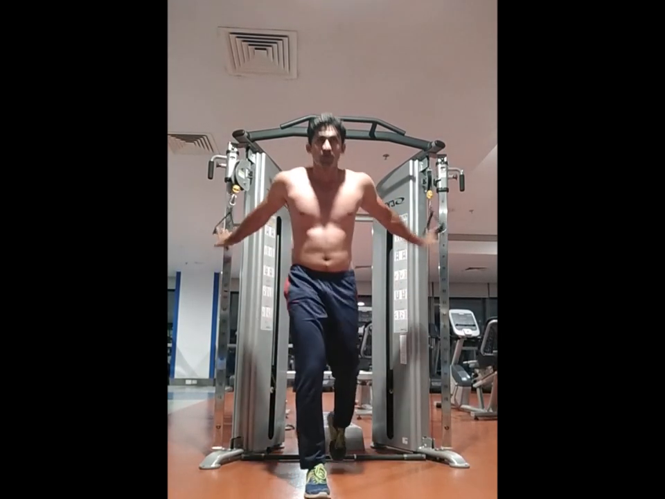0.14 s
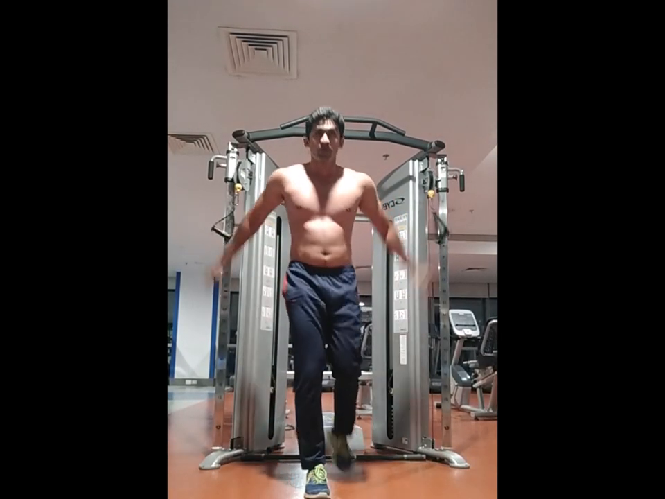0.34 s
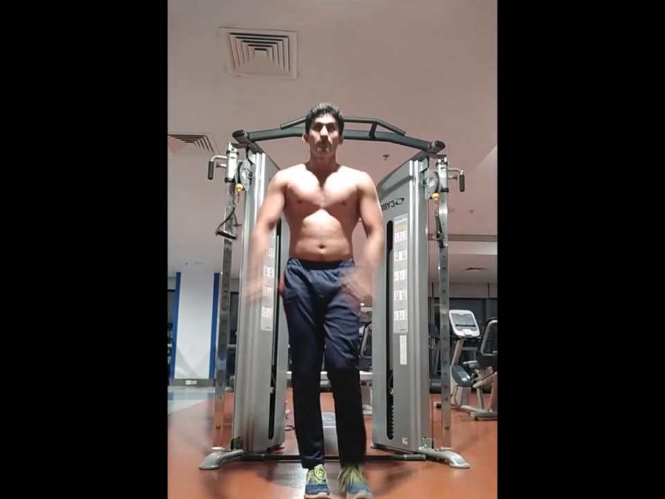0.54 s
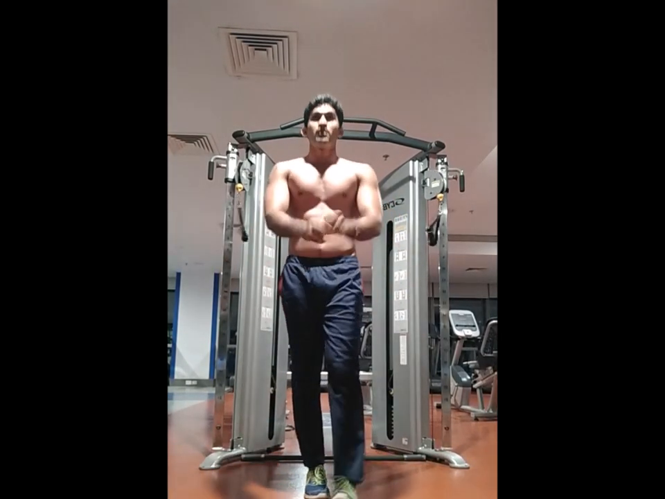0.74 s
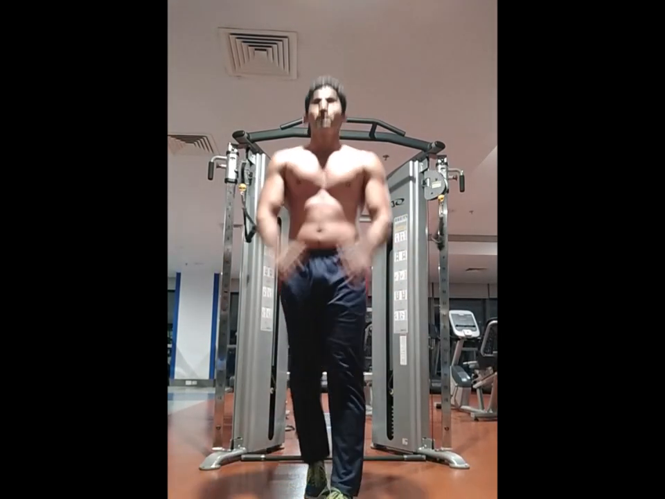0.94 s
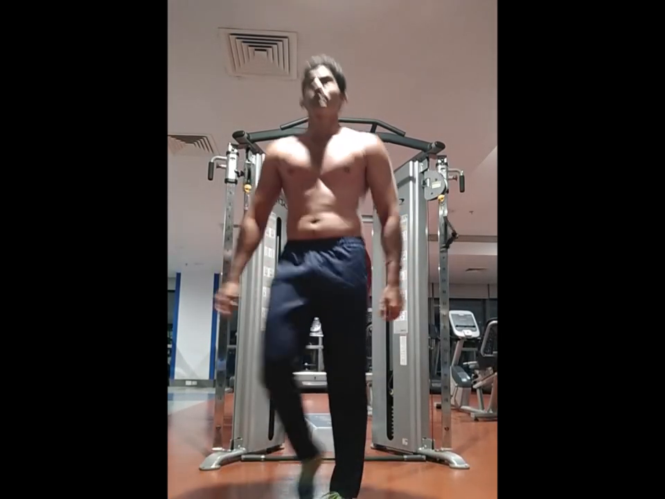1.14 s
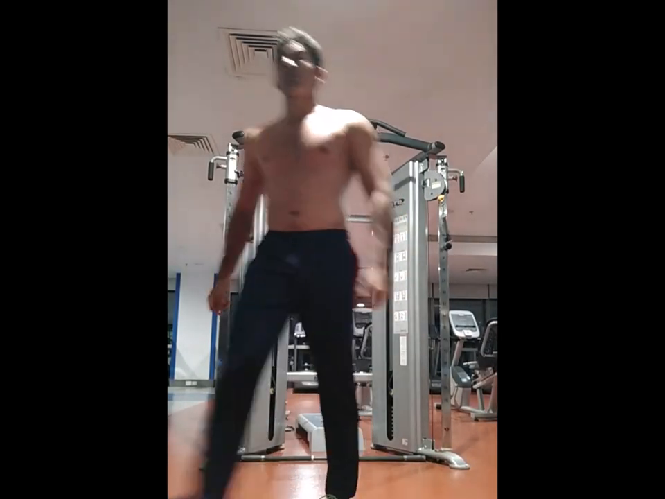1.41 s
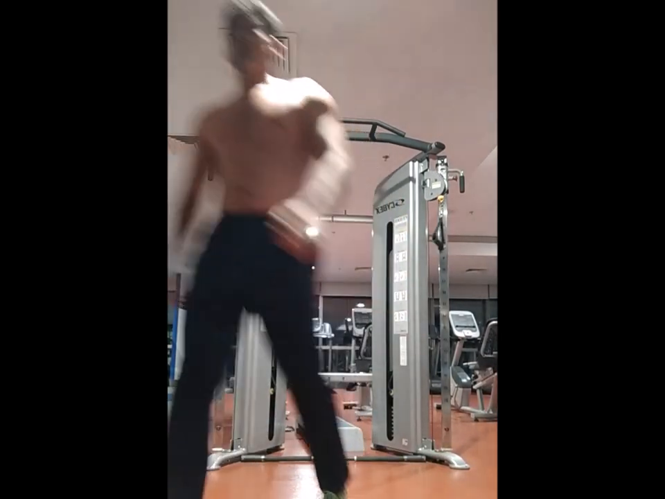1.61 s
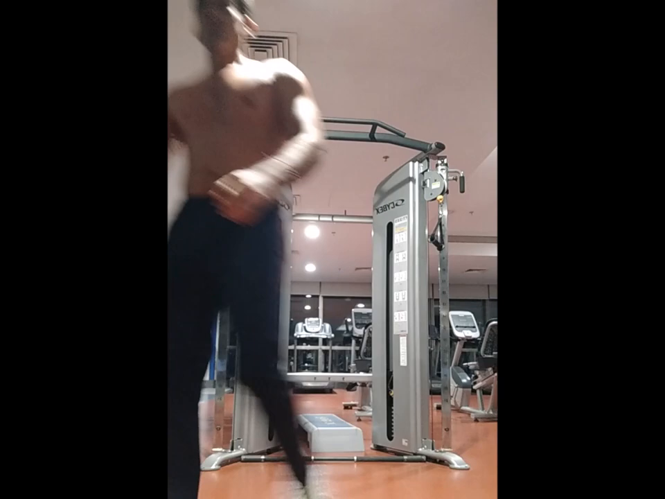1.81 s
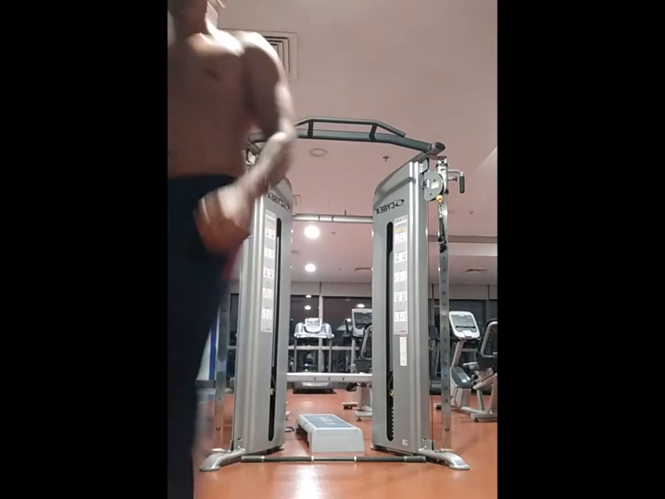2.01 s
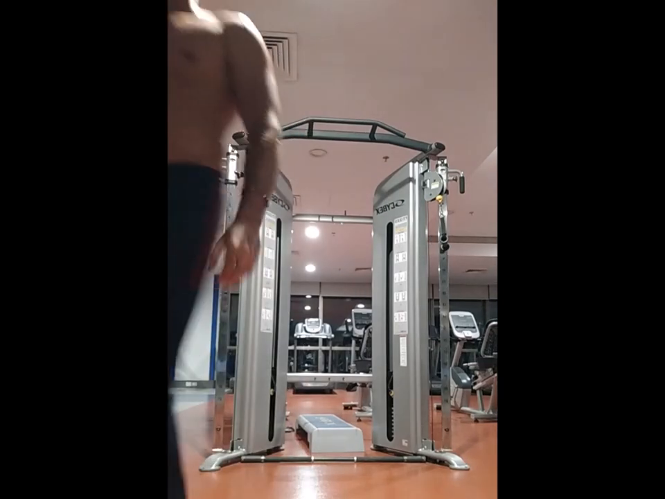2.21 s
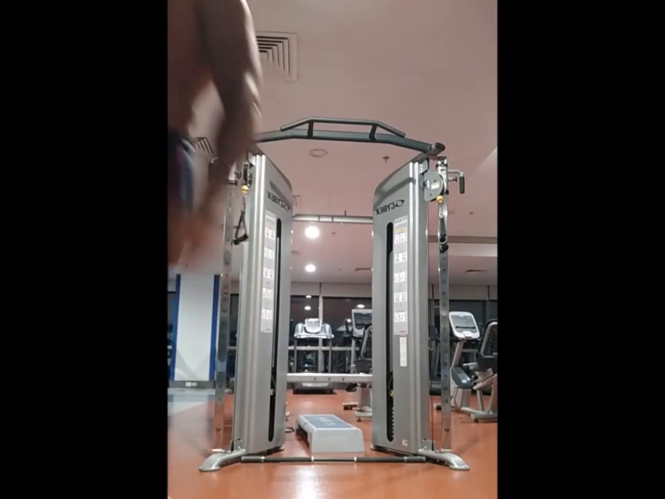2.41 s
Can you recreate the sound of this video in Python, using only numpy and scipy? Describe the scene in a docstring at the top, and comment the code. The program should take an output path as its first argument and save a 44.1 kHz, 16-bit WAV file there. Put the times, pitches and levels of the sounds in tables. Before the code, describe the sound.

A loud steel clank as cable machine handles are let go: brief buckle rattle, bright clang, weight stack landing with clatter, then echo and fainter taps in a bare gym, heard by a phone a few metres away.

```python
"""A gym: the handles of a cable machine are let go. A buckle rattles, a handle clangs on the steel frame, the weight
stack lands, then a swinging handle taps a side panel and a guide rod ever more faintly. Blows ring decaying modes.
Throughout, a long bare hall answers (filtered noise tails) over ventilation (shaped noise, wavering tones) and a
faint high trill (pulsed sine), probably a cricket. A phone a few metres away listens with two ports."""
import sys
import numpy as np
from scipy import signal
from scipy.fft import rfft, irfft
from scipy.io import wavfile
from scipy.ndimage import uniform_filter1d

SR = 44100
rng = np.random.default_rng(int(sys.argv[2]) if len(sys.argv) > 2 else 0)


def voltage_ratio(level):
    """Linear amplitude factor for a level in decibels (scalar or array-like)."""
    return 10 ** (np.asarray(level, float) / 20)


def persist_wave(psi):
    """Save psi, clipped to +-1, as 16-bit WAV."""
    counts = np.round(np.clip(psi, -1, 1) * 32767).astype(np.int16)
    wavfile.write(sys.argv[1], SR, np.atleast_2d(counts).T)


N = 112454


def table(rows, hz):
    """Read (hz, value) rows on a log-frequency axis."""
    rows = np.array(rows, float)
    return np.interp(np.log(hz + 1), np.log(rows[:, 0]), rows[:, 1])


def walk(rate_hz):
    """Slow random wander, spread 1, about rate_hz new values a second."""
    k = int(SR / rate_hz)
    steps = np.repeat(rng.standard_normal(N // k + 1), k)
    w = uniform_filter1d(uniform_filter1d(steps, k), k)[:N]
    return (w - w.mean()) / w.std()


MODE_SCATTER_DB, BUILD_CYCLES = 1, 1.86  # build-up is counted in cycles, so low modes come late
CRASH_T60_S, CRASH_RISE_S, CRASH_LOW_CUT_HZ = 0.056, 0.0044, 507


def struck(blows, modes):
    """Each blow is a chatter of contacts that rings the modes, a little differently each time, and a noise crash."""
    out = np.zeros(2 * N)
    hz, mode_db, t60_s = np.array(modes, float).T[:, :, None]
    t = np.arange(N // 4) / SR
    build = (1 - np.exp(-t * hz / BUILD_CYCLES)) ** 2
    ring = voltage_ratio(mode_db - 60 * t / t60_s) * build * np.sin(2 * np.pi * hz * t)
    high_pass = signal.butter(2, CRASH_LOW_CUT_HZ, "high", fs=SR)
    for start_s, level_db, crash_db, contact_ms, chatter_ms in blows:
        u = t[:N // 40] * 1000 / chatter_ms
        chatter = np.sqrt(u) * np.exp(-2 * u) * rng.standard_normal(len(u)) ** 3
        chatter = chatter / np.sqrt(np.sum(chatter ** 2))
        # divide by the chatter's spectrum at each mode, so each gets about its tabled share
        drive = np.abs(np.exp(-2j * np.pi * hz * t[:len(u)]) @ chatter)
        weight = voltage_ratio(MODE_SCATTER_DB * rng.standard_normal(len(modes))) / np.maximum(drive, .3)
        crash = voltage_ratio(crash_db - 60 * t / CRASH_T60_S) * (1 - np.exp(-t / CRASH_RISE_S))
        crash = signal.lfilter(*high_pass, crash * rng.standard_normal(len(t)))
        sound = signal.fftconvolve(weight @ ring + crash, chatter)[:len(t)]
        # a longer contact dulls the blow
        keep = np.exp(-1000 / (max(contact_ms, .005) * SR))
        sound = signal.lfilter([1 - keep], [1, -keep], sound)
        first = int(start_s * SR)
        out[first:first + len(t)] += voltage_ratio(level_db) * sound
    return out[:N]


# handle on the frame: start_s, level_db, crash_db, contact_ms, chatter_ms
HANDLE_BLOWS = [(.2345, -7.5, -36, 0.11, 2.8), (.2400, -4, 2.5, 0.18, 1.4), (.255, -18, -23, .05, 10.6),
                (.286, -18, 18, 0.076, 7.5), (.325, -14.5, -30, 0.19, 4.2), (.838, -23, -35, 0.38, 12)]
# its modes: pitch_hz, level_db, t60_s
HANDLE_MODES = [(1428, -4, 0.071), (1540, -11, 0.08), (1830, -22, 0.24), (1843, -16.5, 0.16),
                (2099, -2, 0.11), (2525, -10, 0.078), (2603, -12, 0.073), (3190, -15.5, 0.067),
                (4157, -6.5, 0.029), (4400, -14, 0.07)]


def handle_clang():
    """Handle striking the steel frame: bright modes of the steel."""
    return struck(HANDLE_BLOWS, HANDLE_MODES)


# frame tube tones, some in close pairs: pitch_hz, level_db, tone_group
FRAME_TONES = [(1415, 8, 0), (1440, -8, 0), (2118, 7, 1), (2092, -9, 1), (3435, 5, 2)]
# level of each tone group as it dies away unevenly: time_s, group_0_db, group_1_db, group_2_db
FRAME_LEVELS = [(0.24, -25.5, -25, -32), (0.252, -30, -30, -45), (0.278, -40, -49, -52),
                (0.33, -35, -58, -61), (0.344, -31.5, -39, -57), (0.352, -32.5, -27.5, -57),
                (0.366, -30, -35, -22.5), (0.392, -47, -41, -33), (0.412, -37, -38, -37),
                (0.434, -46, -33, -46), (0.508, -41.5, -37, -61), (0.596, -43.5, -37, -35.5),
                (0.626, -53, -59, -35), (0.652, -34.5, -37.5, -40), (0.726, -45, -42, -45.5),
                (0.756, -39, -47, -49.5), (0.778, -44.5, -45, -65.5), (0.826, -52, -70, -62),
                (0.852, -42, -39, -60), (0.89, -43.5, -45.5, -54), (0.916, -38, -57, -74),
                (0.952, -45, -44.5, -72), (0.978, -72, -64, -67), (1.022, -73, -52, -62),
                (1.056, -65.5, -65.5, -73), (1.29, -59.5, -65, -74), (1.316, -64, -76, -68),
                (1.49, -68, -67, -86), (1.516, -70, -68, -69), (1.582, -71, -77, -76),
                (1.664, -67, -72.5, -85), (1.8, -80, -81, -90)]
# one per tone group: gain_db
FRAME_GAIN_DB = [-0.7, -0.3, -2.5]


def frame_ring():
    """The frame tube rings on after the clang; its tones waver, dip and swell again as they die away."""
    t, curve = np.arange(N) / SR, np.array(FRAME_LEVELS)
    levels_db = [np.interp(t, curve[:, 0], curve[:, k + 1], left=-120, right=-120) + gain_db
                 for k, gain_db in enumerate(FRAME_GAIN_DB)]
    out = np.zeros(N)
    for pitch_hz, level_db, group in FRAME_TONES:
        level = voltage_ratio(level_db + levels_db[group] + 2.47 * walk(30.6))
        out += level * np.sin(2 * np.pi * pitch_hz * t + 1.07 * walk(25.07))
    return out


# weight stack on its stops: start_s, level_db, crash_db, contact_ms, chatter_ms
STACK_BLOWS = [(.3630, -7.5, -3, 0.045, 0.92), (.370, -13.5, 16.5, 0.15, 5.5), (.381, -21, -3, .1, 4.5),
               (.40, -20, -1, 0.2, 5), (.445, -17, -8, 0.21, 6.7), (.48, -25, -7, 0.11, 3.2),
               (.53, -28.5, -4, 0.043, 5.4), (.575, -24, -5, 0.14, 4), (.645, -24, -4, 0.08, 2.5),
               (.715, -52, -8, 0.18, 7), (.77, -48, -3.5, 0.14, 5.9), (.845, -45, -15, 0.13, 4.1)]
# its modes: pitch_hz, level_db, t60_s
STACK_MODES = [(240, -16, 0.17), (421, -15, 0.14), (564, -16.5, 0.12), (614.7, -15.5, 0.12),
               (654.1, -15.5, 0.16), (794, -9.5, 0.036), (908, -14, 0.042), (1015, -10, 0.1),
               (1167, -8.5, 0.089), (1219, -21, 0.1), (1500.6, -5.5, 0.04), (3451, -6.5, 0.068),
               (3520, -11.5, 0.1), (3705, -10, 0.046), (3884, -13.5, 0.086), (4616, -11.5, 0.03)]


def stack_landing():
    """Weight stack landing on its stops: one hard blow, then weaker ones, on low and high modes."""
    return struck(STACK_BLOWS, STACK_MODES)


# steel clips and buckles on the cables: start_s, level_db, crash_db, contact_ms, chatter_ms
CLIP_BLOWS = [(.09, -30.5, -24, 0.2, 3.5), (.1345, -27, 5.5, 0.054, 1.6), (.1401, -29, 7.5, 0.048, 4),
              (.165, -34, 13.5, 0.054, 30), (.19, -34, -14, 0.035, 15), (.20, -29, -4, 0.057, 5.4)]
# their modes: pitch_hz, level_db, t60_s
CLIP_MODES = [(914, 8, 0.019), (1334, -0.5, 0.058), (2608, -6, 0.055), (3660, 0, 0.035), (5575, -2, 0.057)]


def clip_rattle():
    """Clips and buckles rattling on the cables: short-lived modes."""
    return struck(CLIP_BLOWS, CLIP_MODES)


# snap hook: start_s, level_db, crash_db, contact_ms, chatter_ms
HOOK_BLOWS = [(.075, -49.5, 10, 0.0049, 49), (.232, -26, 15, 0.022, 90), (.280, -19, 2, 0.012, 7.6),
              (.2875, -15, -11.5, 0.0049, 2), (.36, -36.5, 11.5, 0.012, 6.6), (.44, -34, 10.5, 0.011, 56)]
# its modes: pitch_hz, level_db, t60_s
HOOK_MODES = [(6580, -14.5, .03), (10820, 3, 0.016), (14100, -2, 0.015)]


def hook_jingle():
    """Snap hook jingling: a small part, so only very high modes."""
    return struck(HOOK_BLOWS, HOOK_MODES)


# swinging handle on the side panel: start_s, level_db, crash_db, contact_ms, chatter_ms
TAP_BLOWS = [(1.003, -42, 5, 0.017, 15), (1.0115, -20, -8, 0.029, 0.98)]
# its modes: pitch_hz, level_db, t60_s
TAP_MODES = [(1150, -23, 0.078), (3430, -6, 0.028), (5940, -9.5, 0.022), (6210, -17, 0.013)]


def panel_taps():
    """Swinging handle tapping the side panel: brief contacts, mostly high modes."""
    return struck(TAP_BLOWS, TAP_MODES)


# same handle on a guide rod: start_s, level_db, crash_db, contact_ms, chatter_ms
ROD_BLOWS = [(1.503, -44.5, 4, 0.011, 8), (1.510, -30.5, -1, 0.015, 1.45), (1.519, -42, 6, 0.01, 14),
             (1.545, -47, 6, 0.022, 16), (1.979, -35.5, -21, 0.08, .7), (2.3475, -43, -10, .04, 1.7)]
# its modes: pitch_hz, level_db, t60_s
ROD_MODES = [(1100, -15, .07), (3270, -16, .08), (3686, -7.5, .04), (4300, -18, 0.055), (4780, -22, .04),
             (5540, -12, 0.035), (6110, -9.5, 0.031), (13900, -16, 0.099)]


def rod_taps():
    """The same handle then tapping a guide rod: high, thin modes."""
    return struck(ROD_BLOWS, ROD_MODES)


# steps on the rubber floor or a panel knocked: start_s, level_db, crash_db, contact_ms, chatter_ms
THUD_BLOWS = [(1.018, -33.5, -6, 0.23, 16), (1.088, -33.5, -12, 0.098, 1.5), (1.135, -42, -11, 0.19, 1.8),
              (1.188, -48, -7, 0.26, 2.9), (1.52, -39.5, -18, 0.4, 4.7), (1.605, -47, -13, 0.15, 2.6),
              (1.637, -46, -10, 0.13, 2.1)]
# their modes: pitch_hz, level_db, t60_s
THUD_MODES = [(229, 13.5, 0.05), (333, 3, 0.075), (436, 10, 0.064), (540, 7.5, 0.069), (608, 14.5, 0.045),
              (840, -5.5, 0.063), (1050, -4, 0.06)]


def thuds():
    """Dull thuds, steps on the rubber floor or a panel knocked: low, quickly damped modes."""
    return struck(THUD_BLOWS, THUD_MODES)


# frame on the floor: start_s, level_db, crash_db, contact_ms, chatter_ms
BOOM_BLOWS = [(.03, -46, -45, 3, 6.2), (.135, -25, -31, 4, 5), (.24, -23, -32, 1.9, 2.15),
              (.325, -22, -24, 3, 4.9), (.44, -28.5, -26.5, 2.2, 5.8)]
# its modes: pitch_hz, level_db, t60_s
BOOM_MODES = [(70, -10, .15), (96.5, 18.5, 0.12), (132.2, 15, 0.079)]


def floor_boom():
    """The frame booming on the floor: long soft contacts ring bass modes."""
    return struck(BOOM_BLOWS, BOOM_MODES)


# soft hollow bumps: start_s, level_db, pitch_hz, time_to_peak_ms
BUMPS = [(0, -29.5, 240, 7.9), (0.071, -27, 248, 6.2), (0.189, -27, 195, 11.6), (0.274, -20, 247, 3.9),
         (0.456, -15, 438, 6.4), (0.559, -16.5, 230, 4.5), (0.609, -30.5, 415.8, 37), (0.868, -31, 405, 10),
         (1.021, -26.5, 412.6, 7.2), (1.045, -26, 237, 17.3), (1.103, -35, 421, 11),
         (1.13, -40, 226.5, 6.7), (1.19, -33, 540, 6.4), (1.25, -33.5, 540, 7.9), (1.271, -31.5, 416, 4.4),
         (1.38, -38, 413, 15), (1.527, -37.5, 450, 5.7), (1.538, -36, 284, 5), (1.568, -35, 220, 7.4),
         (2.028, -33, 229, 9.3), (2.167, -43, 260, 5.1), (2.467, -37, 155, 6.4)]


def bumps():
    """Each bump, perhaps a panel or the floor flexing, is one low tone that swells quickly and dies away."""
    out, t = np.zeros(2 * N), np.arange(N // 10) / SR
    for start_s, level_db, pitch_hz, peak_ms in BUMPS:
        u = t * 1000 / peak_ms
        first = int(start_s * SR)
        out[first:first + len(t)] += voltage_ratio(level_db) * u * np.exp(1 - u) * np.sin(2 * np.pi * pitch_hz * t)
    return out[:N]


# reverberation time: freq_hz, t60_s
HALL_T60 = [(60, 0.67), (250, 1.54), (1000, 1.474), (3000, 1.103), (6000, 1.12), (9000, 0.5), (14000, 0.52)]
HALL_DB, HALL_GAP_S, HALL_RISE_S = 2, 0.00058, 0.0031


def hall(x):
    """Two unrelated diffuse tails of noise; each frequency dies at its own rate."""
    hz, t, z = signal.stft(rng.standard_normal((2, N)), SR, nperseg=256)
    decay = voltage_ratio(-60 * t / table(HALL_T60, hz)[:, None])
    tail = signal.istft(z * decay, SR, nperseg=256)[1][:, :N]
    tail = tail * np.clip((np.arange(N) / SR - HALL_GAP_S) / HALL_RISE_S, 0, 1)
    tail = tail * voltage_ratio(HALL_DB) / np.sqrt(np.sum(tail ** 2) / 2)
    return signal.fftconvolve(x[None], tail, axes=1)[:, :N]


# trill: time_s, relative_level_db, pulse_depth (0-1)
TRILL = [(0, -60, 0.62), (0.079, -68, 0.61), (.45, -50, .5), (0.849, -66, 0.45), (1.15, -73, 0.66),
         (1.299, -66, .7), (1.5, -57.5, 0.64), (1.54, -53, 0.27), (1.599, -67, 0.34), (1.72, -69, 0.33),
         (1.84, -70, .1), (1.87, -80, 0.44), (1.96, -73, .4), (2.0, -62.5, 1), (2.16, -56, 0.59),
         (2.21, -63, 1), (2.25, -66, 0.43), (2.33, -73, 0.51), (2.42, -72, 0.17), (2.46, -66, .1),
         (2.55, -70, .1)]
TRILL_HZ, TRILL_RATE_HZ, TRILL_PEAK_S = 4044, 25.6, 1.987  # pitch, pulse rate, time of one pulse peak
TRILL_GAIN_DB, TRILL_LEFT_OVER_RIGHT_DB = -5, 19.5


def trill():
    """A thin high tone, pulsed to a varying depth, that swells and fades; much louder at the left port."""
    t = np.arange(N) / SR
    time_s, level_db, depth = np.array(TRILL).T
    pulse = 1 + np.interp(t, time_s, depth) * np.cos(2 * np.pi * TRILL_RATE_HZ * (t - TRILL_PEAK_S))
    level = voltage_ratio(np.interp(t, time_s, level_db) + TRILL_GAIN_DB)
    tone = pulse * level * np.sin(2 * np.pi * TRILL_HZ * t + .5 * walk(14.1))
    return tone * voltage_ratio(np.array([[TRILL_LEFT_OVER_RIGHT_DB], [-TRILL_LEFT_OVER_RIGHT_DB]]) / 2)


# rush spectrum: freq_hz, relative_db_per_hz
AIR = [(15, -45.5), (25, -24), (110, -1.5), (326, -3.5), (427, -3), (488, -1.5), (590, -1.5), (3320, -16.5),
       (4130, -15.5), (4600, -21), (7480, -35), (13900, -29.5), (15900, -27)]
AIR_DB = -56  # rms of the rush
# motor tones: pitch_hz, level_db
AIR_TONES = [(95, -72), (226, -94.5), (425, -67.5), (544, -71)]


def air():
    """Ventilation: broad steady rush of shaped noise and a few wavering motor tones."""
    hz, t = np.fft.rfftfreq(N, 1 / SR), np.arange(N) / SR
    rush = irfft(rfft(rng.standard_normal((2, N))) * voltage_ratio(table(AIR, hz)), N)
    out = rush * voltage_ratio(AIR_DB) / rush.std()
    for pitch_hz, level_db in AIR_TONES:
        level = voltage_ratio(level_db + 4.5 * walk(26.27))
        out = out + level * np.sin(2 * np.pi * pitch_hz * t + 2.6 * walk(7.2))
    return out


# microphone colour: freq_hz, gain_db
MIC = [(30, -16), (100, -18.5), (1000, -1.5), (4000, -1.5), (6500, -2), (7700, -19.5), (9000, -6),
       (11000, -9), (14000, -3.5), (16000, -2.5)]
LOW_CUT_HZ = 43.6


def microphone(x):
    """Minimum-phase colour of the phone and its low cut."""
    edges_hz = np.linspace(0, SR / 2, 513)
    # dB doubled: minimum_phase takes the square root of the response
    linear = signal.firwin2(1023, edges_hz, voltage_ratio(2 * table(MIC, edges_hz)), fs=SR)
    coloured = signal.fftconvolve(x, signal.minimum_phase(linear))[:N]
    return signal.sosfilt(signal.butter(3, LOW_CUT_HZ, "high", fs=SR, output="sos"), coloured)


# likeness of the ports for diffuse sound: freq_hz, likeness (-1 to 1)
LIKENESS = [(60, 1), (130, 0.81), (290, 1), (640, 0.78), (1410, -0.2), (3100, -0.16), (6820, 0.0025),
            (15000, -0.02)]
# tilt between the ports: freq_hz, left_over_right_db
LEFT_DB = [(60, -1), (110, 1.5), (200, -2), (380, -1), (700, 2), (1290, 4.5), (2380, 3), (4400, 1),
           (8120, 2.0), (15000, 10)]
# phase lead of left for direct sound: freq_hz, lead_rad
LEAD = [(300, 0.084), (690, 0.16), (1460, 1.84), (2120, 6), (3400, 4.63), (15000, 20.6)]


def ports(direct, diffuse):
    """Direct sound is weaker and later in phase at the right port; diffuse sound is most alike in the bass."""
    hz = np.fft.rfftfreq(N, 1 / SR)
    d, (a, b) = rfft(direct), rfft(diffuse)
    like = np.clip(table(LIKENESS, hz), -1, 1)
    half_db = table(LEFT_DB, hz) / 2
    direct_right = d * voltage_ratio(-2.45 * (2.5 - abs(like))) * np.exp(-1j * table(LEAD, hz))
    diffuse_right = like * a + np.sqrt(1 - like ** 2) * b
    left = (d + a) * voltage_ratio(half_db)
    right = (direct_right + diffuse_right) * voltage_ratio(-half_db)
    return irfft(np.array([left, right]), N)


# share sent to the hall, in the order of the first nine things in scene(): send_db
HALL_SEND_DB = [-2, -0.5, -0.5, -7, -13.5, -9.5, -6, -7, -12]
FRAME_SEND_DB = -18


def scene():
    """The machine, direct and through the hall, over the steady background."""
    things = np.array([
        handle_clang(), stack_landing(), clip_rattle(), hook_jingle(), panel_taps(),
        rod_taps(), thuds(), floor_boom(), bumps(), frame_ring()])
    sends = voltage_ratio(np.append(HALL_SEND_DB, FRAME_SEND_DB))
    direct = microphone(things.sum(axis=0))
    sent = microphone(sends @ things)
    return ports(direct, hall(sent) + air()) + trill()


def roll_off(x):
    """The treble ends steeply here."""
    return signal.sosfilt(signal.butter(12, 16080, fs=SR, output="sos"), x)


def record(dry):
    """The phone cuts the top above 15.8 kHz."""
    top_cut = signal.ellip(8, .2, 70, 15800, fs=SR, output="sos")
    mix = signal.sosfilt(top_cut, dry)
    return roll_off(mix)


dry = scene()
out = record(dry)
persist_wave(out)
```